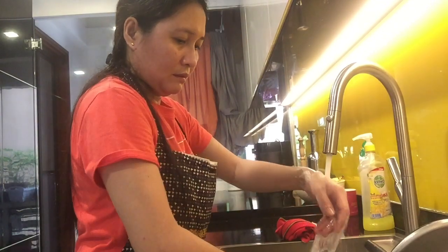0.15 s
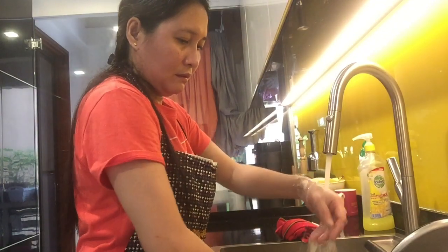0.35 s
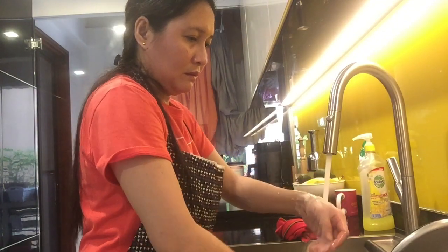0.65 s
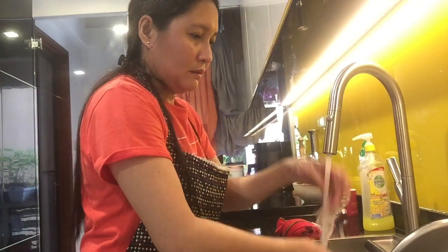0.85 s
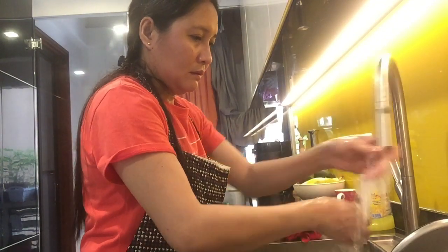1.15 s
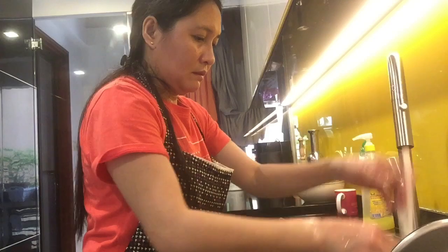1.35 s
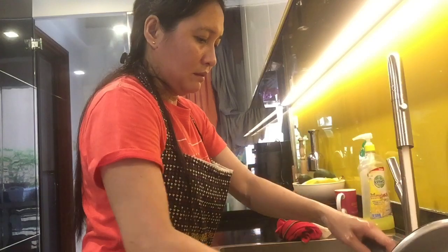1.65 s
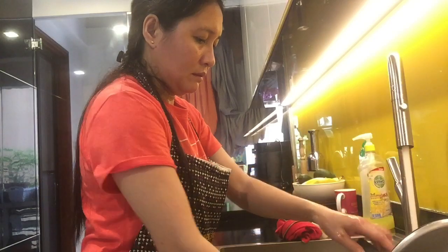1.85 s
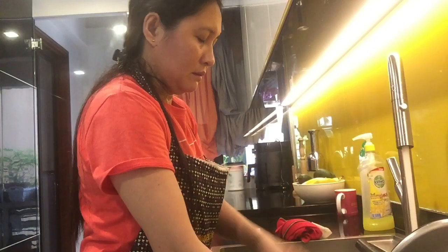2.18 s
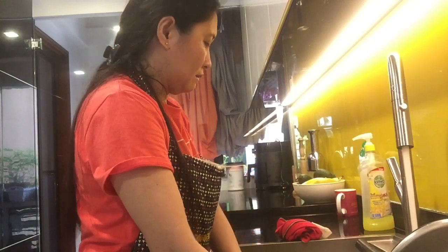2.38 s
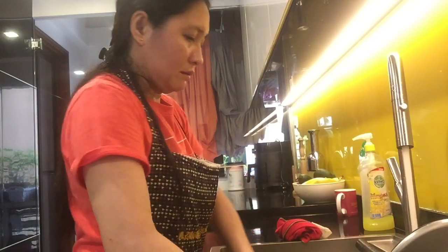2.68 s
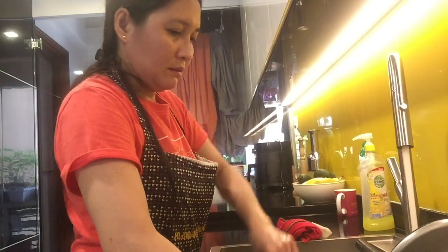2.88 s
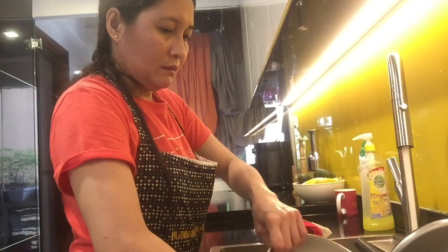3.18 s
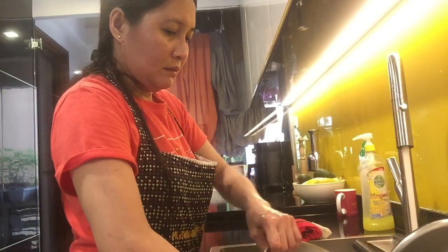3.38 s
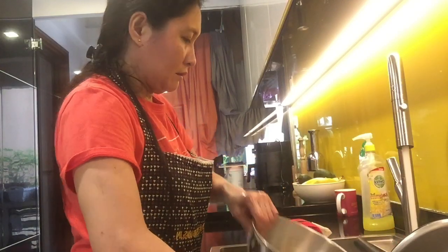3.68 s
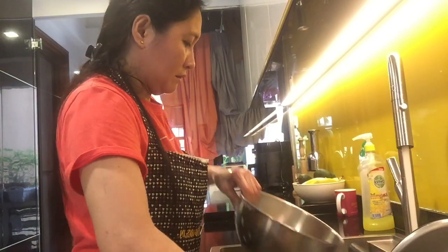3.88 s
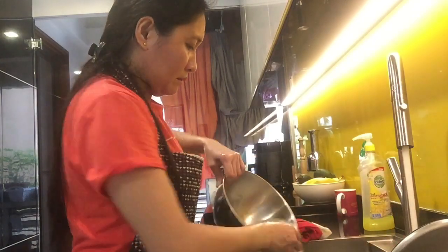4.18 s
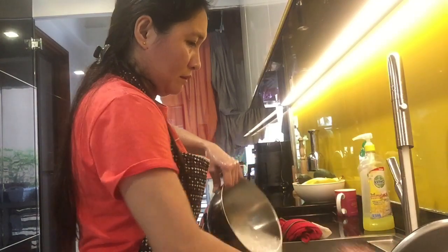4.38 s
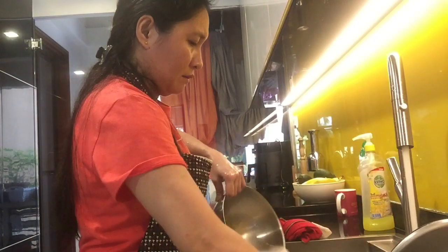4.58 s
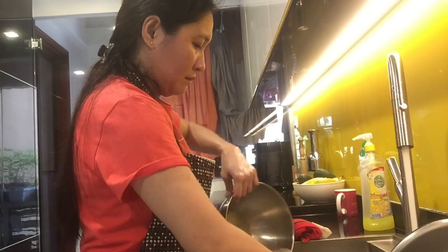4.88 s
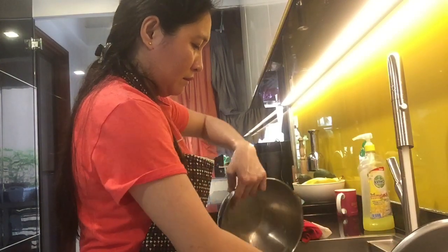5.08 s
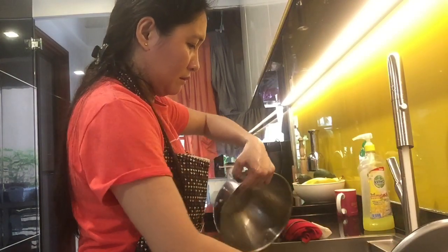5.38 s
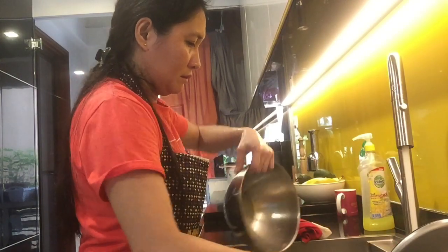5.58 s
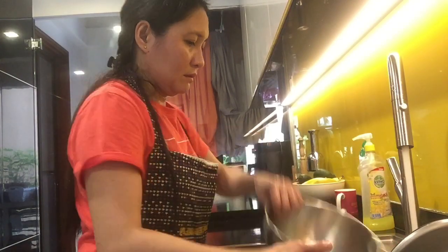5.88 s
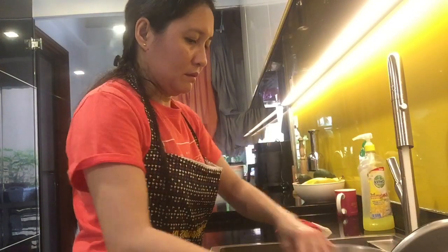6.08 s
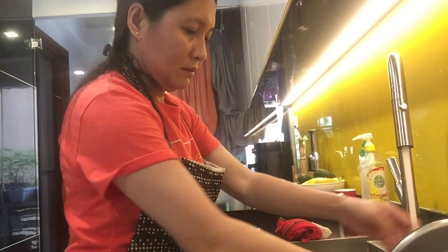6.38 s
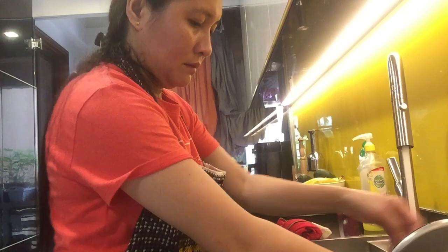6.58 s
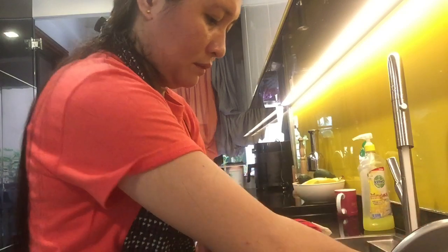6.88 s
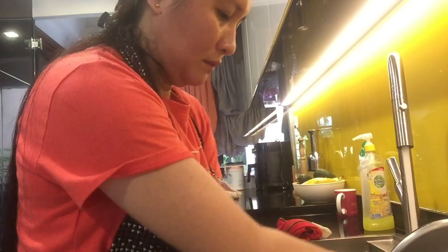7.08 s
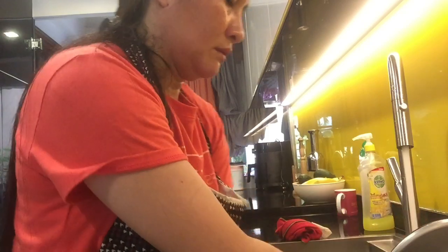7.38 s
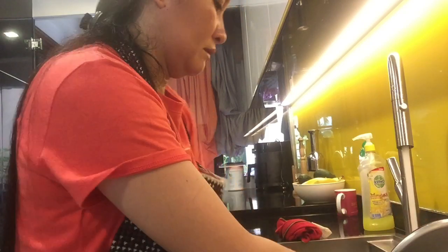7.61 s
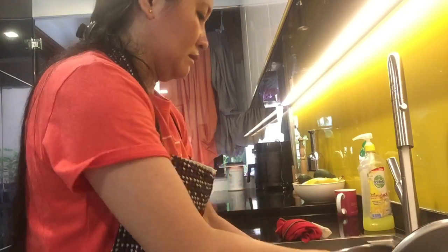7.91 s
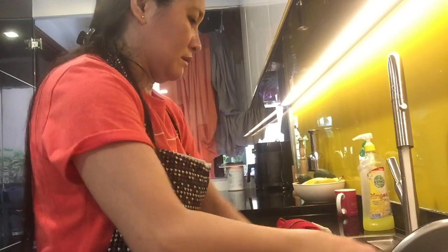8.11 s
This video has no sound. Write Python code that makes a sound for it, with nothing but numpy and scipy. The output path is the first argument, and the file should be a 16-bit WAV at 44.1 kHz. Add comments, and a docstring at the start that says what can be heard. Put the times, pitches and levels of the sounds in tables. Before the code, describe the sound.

An aerated tap hisses, bubbles and splashes steadily into a steel sink for the whole eight seconds, heard close up. In the first second, wet hands rub on dishes, which knock softly, and the basin floor gives a low boom. Scattered light knocks and dull thuds follow, with a small cluster and brief spatters of flicked water between 3 and 4 seconds. At about 4.5 seconds a steel pot crashes against the sink, the loudest moment, then knocks, rings and scrapes until about 5.2. After a short stretch of just water, a thud and a spatter come at 6.1. From 6.5 to 7.6 the pot is shoved about with clanks, short scrapes and hollow booms, and a utensil clinks brightly on it at 6.7. A lighter knock comes near 8.2. The small, hard kitchen adds a short tail to the clatter.

```python
"""Washing up at a steel sink

Close by, an aerated tap hisses and bubbles over the hands and into the basin. Wet skin rubs on dishes,
which knock softly; the basin floor booms when pushed, and flicked water spatters. Halfway through, a
steel pot crashes and knocks against the sink, rings, scrapes and is shoved about, and a utensil clinks
on it. A small, hard kitchen puts a short tail on the clatter."""
import sys
import numpy as np
from scipy import signal
from scipy.fft import rfft, irfft, next_fast_len
from scipy.io import wavfile
from scipy.ndimage import uniform_filter1d, map_coordinates

SR = 44100
rng = np.random.default_rng(int(sys.argv[2]) if len(sys.argv) > 2 else 0)


def to_wav(sig):
    """Store sig (one row per channel, or 1-D mono) as 16-bit WAV at the path in sys.argv[1].

    Samples outside -1..1 are clipped; the rate is SR.
    """
    pcm = np.clip(np.atleast_2d(sig), -1, 1) * 32767
    pcm = np.round(pcm).astype(np.int16)
    wavfile.write(sys.argv[1], SR, pcm.T)  # frames by channels


N = 363825

# level ride of the tap as hands and pot turn its stream: t/s, splash/dB, spray/dB
TAP_RIDE = [(0, -48, -53.5), (.2, -48.5, -56), (.56, -45.5, -53), (.83, -50, -53), (1.2, -49, -52),
            (1.75, -50.5, -48), (2.5, -53.5, -48.5), (3.6, -46, -48), (4.1, -49.5, -53), (4.45, -48, -48),
            (5.5, -48, -51), (5.9, -52, -53), (6.5, -50.5, -50.5), (7.6, -47, -53.5), (8.25, -51, -50)]
# colours of the splash, the fine spray and the water drumming on the basin floor: f/Hz, level/dB
SPLASH_EQ = [(120, -41), (200, -24), (296, 0), (357, 1), (387, -4), (628, -6), (681, 2.5), (739, -3.5),
             (1590, -1.5), (5000, -7.5), (6500, -12.5), (11000, -120)]
SPRAY_EQ = [(2500, -2.5), (4000, 1), (4900, -5), (6000, 1), (7500, -3.5), (9400, 0), (10300, -6.5),
            (11300, -1), (13000, -1.5), (15000, -8), (16000, -6)]
DRUMMING_EQ = [(20, -23), (45, -9), (60, 6.5), (75, -25), (94, 8), (125, -5.5), (168, 2), (210, -4),
               (320, -14.5), (600, -24.5)]
# wet hands rub over the dishes: t/s, length/s, level/dB
RUB_CUES = [(0.081, 0.097, -40.5), (0.3, 0.33, -46), (0.59, 0.21, -47), (3.4, 0.31, -50),
            (3.69, 0.06, -46.5), (6.935, 0.75, -47.5)]
# hollow of the basin with dishes in it: f/Hz, level/dB
HOLLOW_EQ = [(350, 13), (560, 4), (700, 11.5), (900, -2.5), (1100, -4.5), (1380, -3), (1550, 2.5),
             (1730, -5.5), (2100, -3.5), (2600, 0.5), (3300, 1), (4200, 0), (6000, -4), (12000, -26)]
# hollow knocks, light ones from handling dishes, loud or low ones from the pot hitting the basin:
# t/s, level/dB, centre f/Hz, t60/s
KNOCK_CUES = [(.092, -28.5, 1090, 0.41), (.11, -22, 910, 0.22), (.304, -26, 980, 0.43),
              (.321, -24, 2600, 0.087), (.366, -19, 1790, 0.12), (.498, -25, 774, 0.8),
              (.605, -13, 2370, 0.08), (.631, -23, 2150, 0.21), (.683, -19, 740, 0.18),
              (.688, -22, 1320, 0.21), (1.174, -20, 3080, 0.084), (1.404, -25, 730, .13),
              (1.888, -25.5, 1340, 0.15), (2.543, -27.5, 900, 0.37), (3.19, -22.5, 1760, 0.24),
              (3.407, -21.5, 1900, 0.17), (3.495, -22.5, 1830, 0.32), (3.707, -28.5, 2630, 0.45),
              (3.727, -23, 1630, 0.21), (3.898, -28.5, 1640, 0.37), (4.48, -27, 290, 0.14),
              (4.531, 2.5, 930, 0.45), (4.622, -3.5, 885, .3), (6.155, -14.5, 276, 0.21),
              (6.537, -15, 1627, 0.11), (6.632, -18.5, 740, 0.26), (7.323, -4, 530, 0.1),
              (7.326, -9.5, 1240, 0.093), (7.355, -12, 321, 0.24), (7.414, -6, 2295, 0.045)]
# the basin floor is pushed: t/s, level/dB, push time/s, damped after/s
BOOM_CUES = [(.1, -35.5, 0.0071, .07), (0.317, -18, 0.028, 0.23), (.602, -25, 0.0071, 0.067),
             (1.211, -36, 0.027, 0.12), (1.891, -31, 0.02, 0.063), (2.467, -33, 0.0032, 0.075),
             (2.506, -26.5, 0.019, 0.17), (2.83, -37.5, .03, .075), (3.195, -21, 0.015, 0.011),
             (3.739, -38, .013, 0.032), (3.948, -34.5, 0.0089, 0.045), (4.533, -17, .004, 0.12),
             (4.78, -20.5, 0.015, 0.26), (5.169, -35.5, 0.034, 0.15), (6.149, -20, 0.0041, 0.23),
             (6.733, -37, 0.0057, .17), (6.884, -25.5, 0.023, .14), (7.041, -28, 0.027, 0.042),
             (7.206, -32.5, 0.0068, 0.068), (7.324, -15.5, 0.066, 0.2), (7.598, -33.5, 0.015, 0.2),
             (8.137, -26, 0.0047, .2), (8.195, -22, 0.011, .16)]
# colour of the floor's thud: f/Hz, level/dB
THUD_EQ = [(25, -36), (58, -7), (110, -1.5), (160, 9), (205, -3.5), (255, -2), (330, -17), (420, -7.5),
           (900, -46)]
# water is flicked against the basin: t/s, level/dB
SPATTER_CUES = [(1.334, -54), (3.187, -38.5), (3.50, -53), (3.705, -37), (6.14, -31.5), (6.955, -35.5)]
# colour of the landing drops: f/Hz, level/dB
DROPS_EQ = [(2500, -54), (5000, -9), (7800, 3.5), (10300, -6.5), (16000, -13)]
# the pot strikes the sink: t/s, level/dB, hardness/dB, rim lead/s, t60/s
CLASH_CUES = [(4.53, -6.5, -3.5, 0.0069, 0.13), (4.572, -18.5, 1, 0.0038, 0.38),
              (4.62, -13, -5, .008, 0.23), (4.676, -19, -3.5, 0.0064, 0.8), (4.794, -11, -0.5, .022, 0.25),
              (4.835, -14.5, 2, 0.0006, 0.6), (4.903, -11.5, 6.5, 0.016, 0.41),
              (5.036, -25, 6, 0.023, 0.39), (5.08, -32.5, 11, 0.0027, 0.5), (5.143, -30, 8, 0.0003, 0.43),
              (5.179, -34, 19, 0, 0.54), (6.15, -24.5, -11, 0.017, 0.3), (6.209, -35, -15, 0.00093, 0.37),
              (6.494, -30.5, 0, 0.0038, 0.75), (6.533, -29, 11, 0.0027, 0.53),
              (6.567, -24.5, 6.5, 0.00045, 0.19), (6.69, -25.5, 1.5, 0.016, 0.33),
              (6.735, -16, 2.5, .008, 0.43), (6.797, -27, -5.5, 0, .29), (6.955, -24.5, 1.5, 0.025, 0.31),
              (7.21, -16.5, -3.5, .004, 0.25), (7.323, -19, -4, 0.011, 0.47),
              (7.413, -13.5, -1.5, .004, 0.41), (7.581, -27.5, 6, 0, 0.17),
              (8.138, -36.5, -6, 0.0026, 0.26), (8.194, -26, -5, 0.0039, 0.56)]
# colour of the sheet steel's dense modes: f/Hz, level/dB
STEEL_EQ = [(120, 18), (163, -3.5), (213, -23.5), (272, -3), (471, -3), (709, -4), (852, -6.5),
            (1100, -9.5), (1500, -7), (2100, -12), (2700, -13), (3500, -16.5), (4830, -21), (9290, -23),
            (10300, -26), (13100, -21), (15800, -29)]
# ringing modes of the basin and of the pot: f/Hz, level/dB, t60/s
BASIN_MODES = [(156, -4, .3), (245, -9, .3), (278, -7, .3), (328, -6, .3), (400, -7, .3), (433, -6, .28),
               (500, -6, .22), (541, -4, .28), (625, -6, .28), (688, -2, .33), (722, 1, .33), (801, -2, .3),
               (1040, -5, .25), (1082, -3, .3), (1210, -4, .3)]
POT_MODES = [(1249, -3, .6), (1448, -3, .5), (1548, 0, .45), (1700, 0, .45), (1809, -1, .4), (1954, 0, .6),
             (2164, -4, .5), (2430, -3, .35), (2683, 0, .4), (2790, -3, .35), (3525, -3, .5),
             (3758, -7, .4), (4097, -9, .5), (5412, -11, .45), (6020, -8, .4), (6395, -7, .4),
             (7413, -8, .4), (8479, -12, .4), (9152, -6, .45), (9230, -9, .35), (10864, -12, .4),
             (11719, -11, .4), (12365, -8, .4), (13437, -10, .4)]
# the pot's rim drags over the basin: t/s, length/s, level/dB
SCRAPE_CUES = [(4.572, 0.22, -23.5), (4.753, 0.13, -32), (4.915, 0.09, -29.5), (6.745, 0.093, -35.5),
               (7.371, 0.089, -32)]
# a utensil clacks against the pot: t/s, level/dB
CLINK_CUES = [(6.736, -18.5), (6.798, -32)]
# colour of the utensil's dense modes: f/Hz, level/dB
UTENSIL_EQ = [(1500, -35), (2500, 2), (3100, -5.5), (3700, 2.5), (4600, -17), (5400, -2), (5650, -3),
              (6000, 3), (6400, -16), (9000, -45)]
# reverb time of the kitchen: f/Hz, t60/s
KITCHEN_DECAY = [(100, 1), (1000, 0.25), (4000, 0.19), (14000, 0.18)]


def amp(db):
    """Decibels to gain."""
    return np.exp(np.asarray(db) * np.log(10) / 20)


def unit(x):
    """Scaled to rms 1."""
    return x / np.sqrt(np.mean(x ** 2) + 1e-20)


def along(points, hz):
    """A curve through (f/Hz, value) points, read on a log frequency axis."""
    f, v = np.transpose(points)
    return np.interp(np.log(hz + 1), np.log(f + 1), v)


def wobble(rate):
    """A smooth random curve, rate knots a second."""
    return map_coordinates(rng.standard_normal(int(N * rate / SR) + 4), [np.arange(N) * rate / SR])


def filtered(x, gain):
    """x through an EQ whose gain is a function of frequency."""
    m = next_fast_len(len(x) + 4096)
    return irfft(rfft(x, m) * gain(np.fft.rfftfreq(m, 1 / SR)), m)[:len(x)]


def noise(t, gain):
    """Coloured noise of rms 1, as long as t."""
    m = next_fast_len(len(t))
    spectrum = rfft(rng.standard_normal(m)) * gain(np.fft.rfftfreq(m, 1 / SR))
    return unit(irfft(spectrum, m)[:len(t)])


def band(hz, low_hz, high_hz):
    """Gain of a steep band-pass."""
    return 1 / np.sqrt((1 + (low_hz / (hz + 1)) ** 10) * (1 + (hz / high_hz) ** 10))


def crowded(spacing_hz, depth_db):
    """EQ of a body with many close modes: random peaks and dips."""
    knots = rng.standard_normal(int(SR / spacing_hz) + 4)
    return lambda hz: amp(depth_db * np.tanh(np.interp(hz / spacing_hz, np.arange(len(knots)), knots)))


def fade(t, t60):
    """Free decay, 60 dB down at t60."""
    return amp(-60 * t / max(t60, .003))


def swell(t, rise):
    """Attack envelope: contact builds up over the rise time."""
    return 1 - np.exp(-t / max(rise, .0002))


def ring(t, modes, scatter_db, detune, tilt_db=0.):
    """Modes struck at random strengths and detuned by grip and water; tilt is per octave."""
    hz, db, t60 = np.transpose(modes)
    strength, shift, turn = rng.standard_normal((3, len(hz)))
    gains = amp(db + scatter_db * strength + tilt_db * np.log2(hz / hz[0]))
    cycles = np.outer(hz * (1 + detune * shift), t) + turn[:, None]
    waves = np.sin(2 * np.pi * cycles) * amp(-60 * t / t60[:, None])
    return gains @ waves * np.sqrt(2) / np.linalg.norm(gains)


def add(track, s, sound):
    """Mix a sound in at time s."""
    part = track[max(round(s * SR), 0):][:len(sound)]
    part += sound[:len(part)]


def rush(eq, patchy_db, drops_db, count):
    """Water noise of rms 1: a patchy wash with count droplet impacts on it."""
    cells = signal.stft(rng.standard_normal(N), nperseg=512)[2]
    patches = uniform_filter1d(rng.standard_normal(cells.shape), size=7, axis=0)
    patches = unit(uniform_filter1d(patches, size=9, axis=1))
    wash = unit(signal.istft(cells * amp(patchy_db * patches), nperseg=512)[1][:N])
    drops = unit(np.bincount(rng.integers(0, N, count), rng.standard_normal(count), N))
    return unit(filtered(wash + amp(drops_db) * drops, lambda hz: amp(along(eq, hz))))


def bubbles(centre_hz, spread, cycles, glide, count):
    """Small bubbles ring briefly and rise in pitch as they surface."""
    t = np.arange(SR // 25) / SR
    track = np.zeros(N)
    for s, (pitch, size) in zip(rng.uniform(0, N / SR, count), rng.standard_normal((count, 2))):
        hz = centre_hz * np.exp(spread * pitch)
        age = t * hz / cycles
        chirp = np.sin(2 * np.pi * hz * t * (1 + glide * np.tanh(age)))
        add(track, s, amp(2 * size) * age * np.exp(-2 * age) * chirp)
    return unit(track)


def tap():
    """The bed: an aerated stream sprays, splashes, bubbles and drums on the basin floor."""
    t = np.arange(N) / SR
    s, *levels = np.transpose(TAP_RIDE)
    splash_db, spray_db = [np.interp(t, s, level) for level in levels]
    flow = wobble(13)
    gurgle = amp(-10.5) * bubbles(centre_hz=1718, spread=.55, cycles=39, glide=.051, count=700)
    fizz = amp(-11.5) * bubbles(centre_hz=7260, spread=.077, cycles=16, glide=.019, count=900)
    splash = rush(SPLASH_EQ, patchy_db=5, drops_db=-5.5, count=3000) + gurgle
    spray = rush(SPRAY_EQ, patchy_db=.5, drops_db=-10, count=14000) + fizz
    drumming = amp(-51.5 + 2.4 * wobble(4.2)) * noise(t, lambda hz: amp(along(DRUMMING_EQ, hz)))
    return amp(splash_db - 1.6 + .7 * flow) * splash + amp(spray_db + 2 + .4 * flow) * spray + drumming


def stick_slip(length, rate):
    """Friction as random jerks, about rate a second, faded in and out."""
    size = int(length * SR)
    jerks = (rng.random(SR) < rate / SR) * rng.standard_normal(SR)
    return jerks[:size] * signal.windows.tukey(size)


def drag(jerks, response):
    """Every jerk sounds the response; the stroke comes out near rms 1."""
    stroke = signal.fftconvolve(jerks, response)
    return stroke / np.sqrt(np.sum(stroke ** 2) / len(jerks) + 1e-20)


def rubs():
    """Wet skin slips in small jerks that sound the hollow of the basin."""
    t = np.arange(SR // 8) / SR
    track = np.zeros(N)
    for s, length, db in RUB_CUES:
        jerks = stick_slip(length, rate=350)
        hollow = noise(t, lambda hz: amp(along(HOLLOW_EQ, hz)) * band(hz, 760, 2760))
        add(track, s, amp(db) * drag(jerks, hollow * fade(t, .067)))
    return track


def nudges(count, db, centre_hz, t60):
    """Cues for faint knocks at random times, scattered in level and pitch."""
    return [(when * N / SR, db + 6 * (size - .5), centre_hz * 2 ** (2 * pitch - 1), t60)
            for when, size, pitch in rng.random((count, 3))]


def knocks():
    """Hollow knocks: light ones from handling dishes, loud or low ones from the pot hitting the basin."""
    t = np.arange(SR // 2) / SR
    track = np.zeros(N)
    for s, db, centre_hz, t60 in list(KNOCK_CUES) + nudges(count=10, db=-43.5, centre_hz=1590, t60=.24):
        octaves = 1.32 * t60 ** .82  # a longer knock covers a broader band
        peak = lambda hz: 1 / (1 + (np.log2((hz + 1) / centre_hz) / octaves) ** 2)
        modes = crowded(spacing_hz=109.25, depth_db=11.5)
        clack = noise(t, lambda hz: modes(hz) * amp(along(HOLLOW_EQ, hz)) * peak(hz))
        envelope = swell(t, .0012) * (.69 * fade(t, t60) + .45 * fade(t, .02))
        add(track, s, amp(db - 8.5) * envelope * clack)
    return track


def booms():
    """The wide basin floor swings in its two lowest modes until a load stills it, with a short thud."""
    t = np.arange(SR // 2) / SR
    track = np.zeros(N)
    for s, db, push, damped_after in BOOM_CUES:
        hz = 92.7 * (1 + .014 * rng.standard_normal())  # the load shifts the pitch a little
        boom = np.sqrt(2) * np.sin(2 * np.pi * hz * t) * fade(t, .9)
        overtone = amp(-7) * np.sqrt(2) * np.sin(2 * np.pi * 1.9 * hz * t) * fade(t, .29)
        # a slower push gives a duller, weaker thud
        edge_hz = 190 + 3.7 / push
        thud_db = 1.5 - 5 * np.log2(push / .0045)
        thud = noise(t, lambda f: amp(along(THUD_EQ, f)) * band(f, 45, edge_hz)) * fade(t, .33)
        envelope = swell(t, push) * fade(np.maximum(t - damped_after, 0), .28)
        add(track, s, amp(db) * envelope * (boom + amp(thud_db) * (thud + overtone)))
    return track


def spatters():
    """Flicked drops land in short, bright bursts."""
    t = np.arange(SR // 3) / SR
    bursts = np.zeros(N)
    for s, db in SPATTER_CUES:
        add(bursts, s, amp(db) * swell(t, .003) * fade(t, .2))
    return bursts * rush(DROPS_EQ, patchy_db=2, drops_db=0, count=8000)


def pot_contacts():
    """Every hit of the pot: t/s, level/dB, hardness/dB, t60/s, rise/s."""
    blows, grazes = [], []
    for s, db, hardness, lead, t60 in CLASH_CUES:
        rise = .00089 * amp(-.2 * db)  # weaker blows build up more slowly
        blows.append((s, db, hardness, t60, rise))
        if lead > .003:  # a tilted pot grazes rim first, lighter and harder
            grazes.append((s - lead, db - 1, hardness + 5, t60, .0041))
    return blows + grazes


def clashes(steel):
    """Each hit of the pot shakes the dense modes of the sheet steel; basin and pot ring on."""
    t = np.arange(SR // 2) / SR
    hz = np.fft.rfftfreq(next_fast_len(len(t)), 1 / SR)
    bands = [steel(hz) * band(hz, *edges_hz) for edges_hz in [(159, 954), (944, 3900), (3770, 15800)]]
    track = np.zeros(N)
    for s, db, hardness, t60, rise in pot_contacts():
        # hardness moves the energy from the low modes to the high ones
        body_db, clang_db, sizzle_db = db - 1.5 - hardness, db - 2, db - 12 + hardness
        # each contact point favours other modes
        spot = crowded(spacing_hz=45, depth_db=6)(hz) * crowded(spacing_hz=650, depth_db=3.5)(hz)
        low, middle, high = [noise(t, lambda f: gain * spot) for gain in bands]
        crack = fade(t, .018)
        # dull, heavy hits favour the basin's low modes
        basin = ring(t, BASIN_MODES, scatter_db=6.5, detune=.015, tilt_db=.5 * np.clip(hardness, -10, 2))
        body = low * (.5 * fade(t, t60) + .16 * crack) + amp(-7.5) * basin
        clang = middle * (.53 * fade(t, t60) + 1.53 * crack)
        sizzle = high * (.62 * fade(t, .51 * t60) + .87 * crack)
        # hard, bright hits ring the pot most
        pot = amp((clang_db + sizzle_db) / 2 - 13) * ring(t, POT_MODES, scatter_db=4, detune=.003)
        blow = amp(body_db) * body + amp(clang_db) * clang + amp(sizzle_db) * sizzle + pot
        add(track, s, swell(t, rise) * blow)
    return track


def scrapes(steel):
    """The pot's rim sticks and slips over the basin; every slip rings sheet and pot."""
    t = np.arange(SR // 3) / SR
    track = np.zeros(N)
    for s, length, db in SCRAPE_CUES:
        jerks = stick_slip(length, rate=260)
        pot = ring(t, POT_MODES, scatter_db=4, detune=.0025) * fade(t, .24)
        sheet = noise(t, lambda hz: steel(hz) * band(hz, 600, 16000) * (hz / 3000) ** .29) * fade(t, .1)
        add(track, s, amp(db) * drag(jerks, sheet + .12 * pot))
    return track


def clinks():
    """A steel utensil, pressed by its neighbours, rings briefly and brightly."""
    t = np.arange(SR // 2) / SR
    track = np.zeros(N)
    for s, db in CLINK_CUES:
        modes = crowded(spacing_hz=60, depth_db=6)
        clack = noise(t, lambda hz: modes(hz) * amp(along(UTENSIL_EQ, hz)))
        envelope = swell(t, .00041) * (.54 * fade(t, .35) + 1.6 * fade(t, .03))
        add(track, s, amp(db) * envelope * clack)
    return track


def kitchen(x):
    """Tiles and cupboards return a short diffuse tail after a 5 ms pre-delay."""
    hz, t, cells = signal.stft(rng.standard_normal(SR // 2), SR, nperseg=256)
    decay = amp(-60 * t / along(KITCHEN_DECAY, hz)[:, None])
    tail = signal.istft(cells * decay, SR, nperseg=256)[1]
    response = np.pad(tail / np.linalg.norm(tail), (SR // 200, 0))
    return signal.fftconvolve(x, response)[:N]


def scene():
    """The mono mix: clatter with its reverb, over dry booms and the running tap."""
    modes = crowded(spacing_hz=36, depth_db=6.5)
    steel = lambda hz: amp(along(STEEL_EQ, hz)) * modes(hz)  # one sink colours clashes and scrapes
    clatter = clashes(steel) + scrapes(steel) + clinks() + knocks() + rubs() + spatters()
    return (clatter + amp(-14.5) * kitchen(clatter) + booms() + tap())[None]


def record(dry):
    """A soft clip rounds the loudest peaks; deep bass is rolled off and the very top is cut."""
    low_cut_hz, top_hz = 36, 15850
    rounded = dry[0] / (1 + dry[0] ** 6) ** (1 / 6)
    return filtered(rounded, lambda hz: (hz < top_hz) / (1 + (low_cut_hz / (hz + 1)) ** 4))[None]


dry = scene()
out = record(dry)
to_wav(out)
```